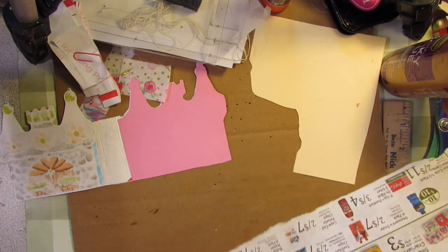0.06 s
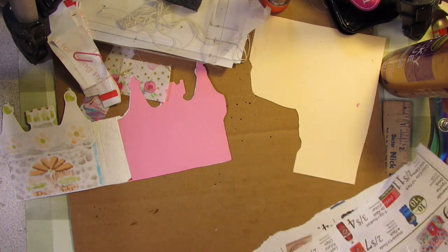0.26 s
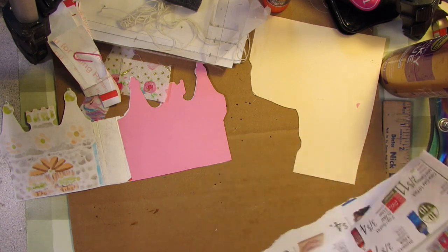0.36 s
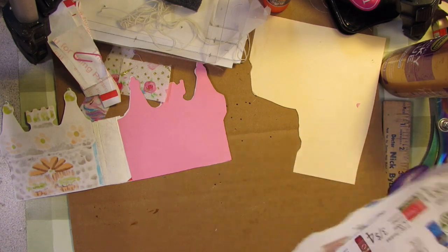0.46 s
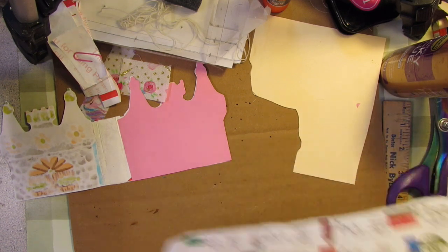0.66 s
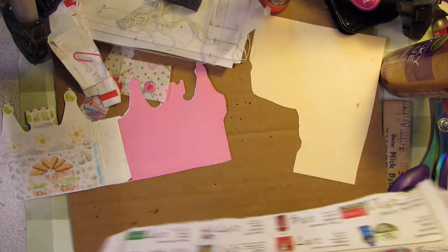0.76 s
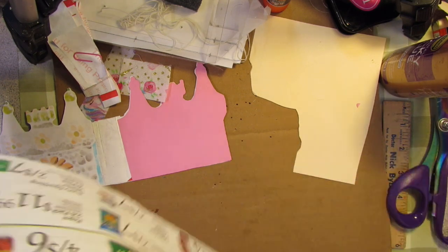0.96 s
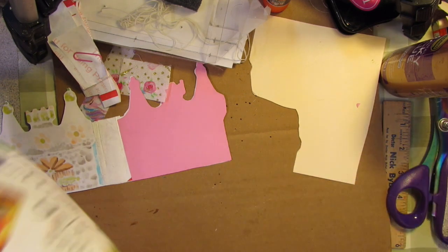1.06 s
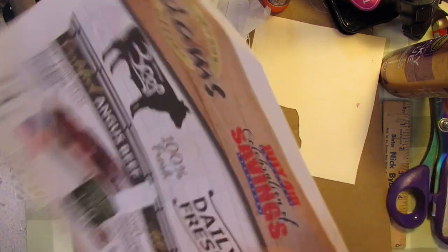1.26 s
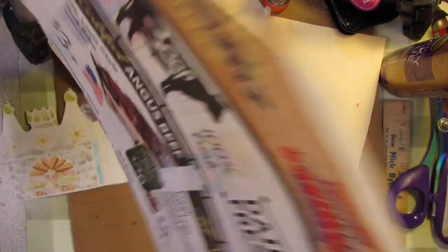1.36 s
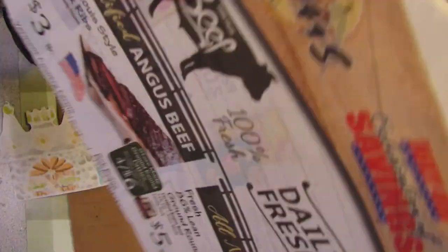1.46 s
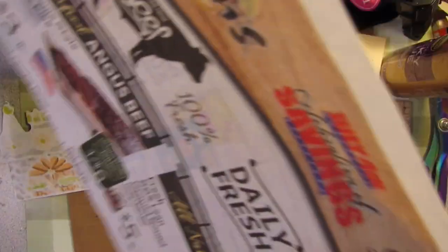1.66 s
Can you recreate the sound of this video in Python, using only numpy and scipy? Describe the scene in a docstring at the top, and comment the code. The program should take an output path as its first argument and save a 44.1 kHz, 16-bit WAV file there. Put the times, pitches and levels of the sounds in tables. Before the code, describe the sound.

A paper flyer rustles and crinkles as it is picked up and turned over.

```python
"""A small, quiet room, microphone close to a desk: a paper flyer is picked up and turned over.
Its pages slide over each other with a grainy hiss, an edge scrapes under the fingers, panels buckle
with soft papery flaps, and creases snap through with sharp ticks. Each snap or flap also shoves
the whole sheet, which answers with a low thump. Faint room tone lies underneath."""
import sys
import numpy as np
from scipy import signal
from scipy.fft import rfft, irfft
from scipy.io import wavfile

SR = 44100
rng = np.random.default_rng(int(sys.argv[2]) if len(sys.argv) > 2 else 0)


def wrap_up_sound(samples):
    """Save the sound to the file named by the first command line argument, as 16-bit audio."""
    columns = np.atleast_2d(samples).T
    # keep every value between -1 and 1, then stretch to whole-number steps
    tamed = np.clip(columns, -1, 1)
    steps = np.round(tamed * 32767).astype(np.int16)
    wavfile.write(sys.argv[1], SR, steps)


N = 74970
TIME = np.arange(N) / SR


def from_db(db):
    """Decibels to gain."""
    return 10 ** (np.asarray(db) / 20)


def unit_rms(x):
    """Scale to unit power."""
    return x / np.sqrt(np.mean(x ** 2) + 1e-20)


def filt(x, hz, kind, order=2):
    """Causal Butterworth filter."""
    return signal.sosfilt(signal.butter(order, hz, kind, fs=SR, output="sos"), x)


def decay(t, t60):
    """An envelope that falls 60 dB in t60 seconds."""
    return np.exp(-np.log(1000) * t / t60)


def ring(x, hz, t60):
    """A resonator: a unit click sets a sine of height 1 ringing."""
    r, w = decay(1 / SR, t60), 2 * np.pi * hz / SR
    return signal.lfilter([1, -r * np.cos(w)], [1, -2 * r * np.cos(w), r * r], x + 1e-18)


def add(out, start, sound):
    """Mix a short mid and side sound in at start seconds."""
    i = int(start * SR)
    out[:, i:i + sound.shape[1]] += sound[:, :N - i]


def along_hz(points):
    """Read a table of (f/Hz, value) at every Fourier bin."""
    hz, value = np.transpose(points)
    return np.interp(np.log(np.arange(N // 2 + 1) * SR / N + 1), np.log(hz), value)


def shaped(x, gain):
    """Apply a gain per Fourier bin."""
    return irfft(rfft(x) * gain, N)


def drift(hz):
    """Random wander of spread 1, mostly slower than hz."""
    return unit_rms(filt(rng.standard_normal(N), hz, "low"))


def friction(grains_per_s=14000, spread_db=3):
    """Fibres catch and let go: dense trains of tiny clicks of uneven size, as mid and side."""
    caught = rng.random((2, N)) < grains_per_s / SR
    sign = rng.choice([-1, 1], (2, N))
    return caught * sign * from_db(spread_db * np.minimum(rng.exponential(1, (2, N)), 4))


def hiss(low_hz, high_hz, corner_hz, count=4):
    """Friction at unit power; its bands swell and sink as the contact wanders over the page."""
    edges, grains = np.geomspace(low_hz, high_hz, count + 1), (friction(), friction())
    patch_db, bands = 3.0, 0
    for k in range(count):
        swell = from_db(patch_db * np.tanh(drift(hz=20.4)))
        bands += swell * filt(grains[k % 2], edges[k:k + 2], "band")
    return unit_rms(filt(bands, corner_hz, "low", order=1))


def puff(swell_s, db, hz, width):
    """A soft noise burst that swells and dies away, in a band from hz / width to hz * width."""
    t = np.arange(SR // 10) / SR
    shape = t / swell_s * np.exp(1 - t / swell_s)
    burst = filt(shape * rng.standard_normal((2, len(t))), [hz / width, hz * width], "band")
    return from_db(db) * np.array([unit_rms(row) for row in burst]) * np.sqrt(np.mean(shape ** 2))


def room_tone(level_db=-66):
    """Steady low room noise with a little microphone hiss, as mid and side."""
    # noise floor spectrum: f/Hz, relative density/dB
    spectrum = [(25, -39), (60, -47), (110, -5.5), (200, -6), (360, -1.5), (550, -7.5), (900, -13.5),
                (2000, -14.5), (5000, -19), (9000, -20.5), (15000, -39.5)]
    # its stereo width: f/Hz, side over mid/dB
    width = [(100, 11), (400, 5.5), (1100, 4.5), (2000, -6), (3500, -30), (5500, -33), (8000, -7),
             (12000, -2)]
    noise = shaped(rng.standard_normal((2, N)), from_db(along_hz(spectrum)))
    mid, side = from_db(level_db) * unit_rms(noise)
    return mid, shaped(side, from_db(along_hz(width)))


def reflections(paper, level_db=-17.5, delay_s=0.0055, top_hz=7560):
    """Desk and walls return a short, dull, diffuse tail, as mid and side."""
    t = np.arange(SR // 2) / SR
    noise = filt(rng.standard_normal((2, len(t))), top_hz, "low", order=1)
    tail = unit_rms(noise * decay(t, t60=0.27) * (t > delay_s)) / np.sqrt(len(t))
    return from_db(level_db) * signal.fftconvolve(paper[:1], tail, axes=1)[:, :N]


def edge_scrape(start_s=0.069, hold_s=0.51, fade_db_per_s=48, level_db=-59.5):
    """An edge drags under the fingers and scrapes unevenly in a narrow band."""
    hz, width = 1870, 1.12
    t = TIME - start_s
    judder_db = 6 * np.tanh(drift(hz=35))
    shape = (t > 0) * from_db(judder_db - fade_db_per_s * np.maximum(t - hold_s, 0))
    return from_db(level_db) * shape * unit_rms(filt(friction(), [hz / width, hz * width], "band"))


def page_slides(judder_db=1.73, billow_db=-25, billow_hz=139):
    """Page rubs on page: each slide swells, holds and fades, juddering in all ranges at once."""
    # body, mid, presence and treble ranges of sliding paper: low edge/Hz, high edge/Hz, roll-off/Hz
    ranges = [(203, 610, 1300), (783, 2500, 3600), (2660, 6650, 6700), (6750, 13940, 2000)]
    # slides: t/s, rise/s, hold/s, fade/(dB/s), body/dB, mid/dB, presence/dB, treble/dB
    strokes = [(-.01, 0.0044, 0.0053, 425, -69.5, -68, -56, -55),
               (0.045, 0.0051, 0.063, 130, -69.5, -64.5, -55.5, -60),
               (0.202, 0.016, 0.01, 400, -66, -53.5, -48, -41.5),
               (0.236, .006, 0.006, 290, -53.5, -45, -38.5, -38.5),
               (0.27, 0.067, 0.13, 173, -69, -65, -50.5, -56),
               (0.418, 0.0049, 0.011, 275, -58, -44.5, -61, -49),
               (0.508, 0.0049, 0.11, 193, -56.5, -51, -61, -84),
               (0.603, 0.0044, 0.011, 227, -47, -41, -49, -59.5),
               (0.613, 0.045, 0.0093, 219, -68, -47.5, -47.5, -49.5),
               (0.677, 0.022, 0.0078, 318, -49, -41, -41, -46.5),
               (0.774, 0.0098, 0.022, 193, -55.5, -42.5, -53, -63),
               (0.799, 0.045, 0.051, 176, -55.5, -48, -48, -48),
               (0.923, 0.018, 0.073, 305, -61, -47.5, -50.5, -49.5),
               (1.067, 0.0051, 0.088, 144, -75, -60.5, -57.5, -49),
               (1.114, 0.0087, 0.013, 245.5, -50, -46.5, -39, -60),
               (1.133, 0.027, 0.042, 275.5, -40.5, -36.5, -40.5, -40),
               (1.201, 0.018, 0.028, 341.5, -70, -55, -52, -46.5)]
    power = 0
    for start, rise, hold, fade, *levels_db in strokes:
        attack = np.clip((TIME - start) / rise, 0, 1)
        release = from_db(-fade * np.maximum(TIME - start - rise - hold, 0))
        power += (from_db(levels_db)[:, None] * attack * release) ** 2
    levels = np.sqrt(power) * from_db(judder_db * drift(hz=89))
    air = unit_rms(filt(rng.standard_normal((2, N)), [billow_hz / 2, billow_hz], "band"))
    billow = from_db(billow_db) * levels[0] * air  # air pushed by the sheet follows the body range
    return billow + sum(level * hiss(*span) for level, span in zip(levels, ranges))


def panel_flaps():
    """A buckling panel gives a papery flap and a thump of the whole sheet."""
    # buckles: t/s, swell/s, flap level/dB, flap f/Hz, band edge ratio, thump level/dB, thump f/Hz
    buckles = [(0.0496, 0.0063, -44.5, 2070, 1.2, -59.5, 400), (.126, 0.00097, -42, 1930, 1.1, -52, 398),
               (0.221, 0.0038, -43, 2230, 1.3, -51, 250), (.251, 0.0026, -35, 1930, 1.27, -70, 300),
               (0.279, .003, -36.5, 2190, 2.2, -56, 404), (0.459, 0.0035, -50, 1500, 2.1, -50, 346),
               (0.574, 0.0069, -31.5, 1340, 1.74, -47, 425), (0.585, 0.0013, -44, 1083, 1, -35.5, 312),
               (.597, 0.003, -36, 1870, 1.76, -68, 330), (0.612, 0.0033, -36, 1450, 0.91, -57, 305),
               (0.693, 0.009, -42, 1800, 1.9, -50, 383), (0.712, 0.0024, -36.5, 1150, 1.7, -44, 395),
               (.811, 0.0032, -38, 1720, 2, -46.5, 394), (.868, 0.0036, -35, 2900, 1.56, -42, 422),
               (.881, 0.0041, -38.5, 1420, 1.12, -34, 420), (0.903, 0.0051, -39, 1350, 1.4, -47, 420),
               (0.938, .005, -38.5, 1960, 1.74, -68, 400), (0.9807, 0.0016, -34, 1730, 1.7, -73, 400),
               (1.08, 0.0037, -43, 1620, 1.2, -54, 404), (1.122, 0.0021, -57, 2020, 2.2, -34.5, 533),
               (1.144, 0.004, -32.5, 1390, 1.7, -37, 446), (1.164, 0.0029, -26, 1850, 1.48, -35, 239),
               (1.190, 0.0028, -35.5, 3080, 1.4, -56, 310), (1.21, 0.0026, -37.5, 2000, 2.8, -53, 304),
               (1.223, .004, -34.5, 2050, 1.3, -46.5, 298), (1.278, 0.006, -43.5, 1620, 1.4, -45, 346),
               (1.289, 0.0032, -72, 1480, 0.5, -41, 356), (1.338, 0.0065, -47.5, 1900, 1.24, -55.5, 334),
               (1.540, 0.0024, -59, 1290, 1.9, -62.5, 296), (1.68, 0.0042, -53.5, 2280, 1.24, -66, 302)]
    out = np.zeros((2, N))
    for start, swell_s, flap_db, flap_hz, width, thump_db, thump_hz in buckles:
        flap = puff(swell_s, flap_db, flap_hz, width=max(width, 1.05))
        thump = puff(swell_s, thump_db, thump_hz, width=1.354)
        add(out, start, flap + thump)
    return out


def hand_bumps():
    """The hand knocks the sheet with soft, deep bumps."""
    # bumps: t/s, level/dB, f/Hz
    bumps = [(0.223, -64, 131), (.535, -59.5, 143), (.613, -53, 146), (0.882, -56.5, 120),
             (1.153, -51.5, 178)]
    out = np.zeros((2, N))
    for start, db, hz in bumps:
        add(out, start, puff(swell_s=0.0085, db=db, hz=hz, width=1.28))
    return out


def crease_snaps(click_db=-6.5, side_db=1.5, ring_cycles=14.2, thump_hz=453):
    """A crease gives way with a broad crack; the nearest facet rings and the sheet thumps."""
    # snaps: t/s, crack gain/dB, top/Hz, ring f/Hz, ring gain/dB, thump gain/dB
    snaps = [(0.2309, -30, 13000, 4860, -29, -54), (0.2439, -8.5, 11900, 1750, -24.5, -63),
             (0.3799, -6, 7000, 4740, -14, -62), (0.4273, 1, 6200, 2480, -19, -47),
             (0.5321, -11, 6600, 3500, -25, -49), (0.6164, -4, 11900, 1640, -42, -33),
             (0.6779, -1.5, 13300, 7430, -19.5, -54), (0.8211, 0, 10800, 1610, -25, -26),
             (.8518, -0.5, 13600, 1390, -19, -28), (0.8766, 3.5, 12100, 2960, -15.5, -32),
             (0.9923, -0.5, 13400, 3500, -15, -34.5), (1.1206, -8, 11800, 7000, -17, -59),
             (1.6316, -41, 2310, 1110, -26, -51), (1.646, -38, 4900, 1480, -26.5, -51.5)]
    out, t = np.zeros((2, N)), np.arange(SR // 10) / SR
    crumple = from_db(-17) * decay(t, t60=0.0038)  # a quick run of tiny breaks
    flutter = from_db(-28) * decay(t, t60=0.059)  # the snap spreads through the sheet
    for start, crack_db, top_hz, ring_hz, ring_db, thump_db in snaps:
        kick = from_db([[0], [side_db]]) * (crumple + flutter) * rng.standard_normal((2, len(t)))
        kick[0, 0] = from_db(click_db)  # the opening click, in the mid only
        crack = from_db(crack_db) * filt(kick, 3780, "low", order=1)
        facet = from_db(ring_db) * ring(kick, ring_hz, t60=ring_cycles / ring_hz)
        tick = filt(crack + facet, 1030, "high", order=4)
        tick = filt(tick, top_hz, "low", order=3)
        thump = from_db(thump_db) * filt(ring(kick, thump_hz, t60=0.032), [260, 2 * thump_hz], "band")
        add(out, start, tick + thump)
    return out


def scene():
    """The flyer over room tone, as left and right; its bass leans left as it passes the microphone."""
    # diffuse width of the paper: f/Hz, side gain/dB
    paper_width = [(80, -3), (200, -4.5), (400, -13), (1000, -10), (2000, -22.5), (3600, -33), (5500, -19),
                   (8000, -6.5), (12000, -4)]
    # leftward lean at the closest pass: f/Hz, share of the mid added to the side
    left_bias = [(60, 0.8), (300, 0.78), (550, 0.57), (1000, 0.32), (2000, .05), (12000, 0.089)]
    # how far the sheet covers the microphone's left port: t/s, share
    port_cover = [(0, 0.64), (.56, 1), (1.28, 0.76), (1.45, 0.36)]
    # where the paper sits in the image: t/s, left over right/dB
    position = [(.28, 0), (.38, 1), (.53, 2), (.62, -0.4), (.9, 0), (1.2, -2), (1.65, 1.5)]
    paper = page_slides() + edge_scrape() + panel_flaps() + hand_bumps() + crease_snaps()
    mid, side = paper + reflections(paper)
    closeness = np.interp(TIME, *np.transpose(port_cover))
    lean = from_db(np.interp(TIME, *np.transpose(position)))
    side = shaped(side, from_db(along_hz(paper_width)))
    side += closeness * shaped(mid, along_hz(left_bias))
    side += mid * (lean - 1) / (lean + 1)
    tone_mid, tone_side = room_tone()
    mid, side = mid + tone_mid, side + tone_side
    return np.array([mid + side, mid - side])


def record(dry):
    """The microphone has a hollow in the low mids; the top is cut steeply."""
    hollow_hz, cutoff_hz = 693, 15200
    hollowed = signal.lfilter(*signal.iirnotch(hollow_hz, Q=5.34, fs=SR), dry)
    return signal.sosfilt(signal.ellip(10, .2, 80, cutoff_hz, fs=SR, output="sos"), hollowed)


dry = scene()
out = record(dry)
wrap_up_sound(out)
```